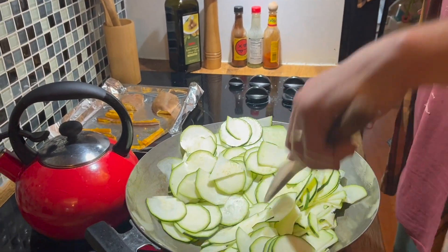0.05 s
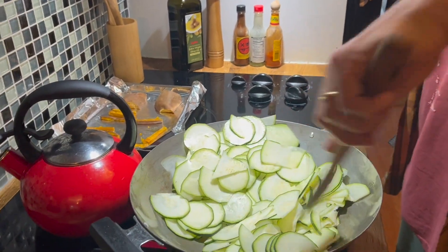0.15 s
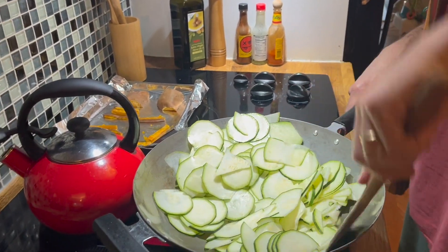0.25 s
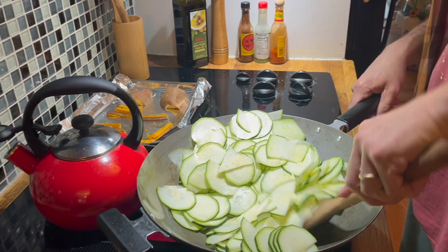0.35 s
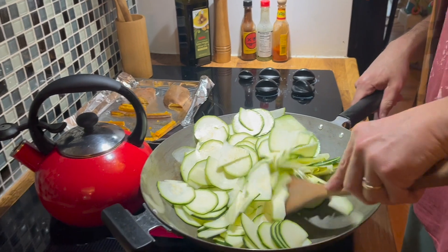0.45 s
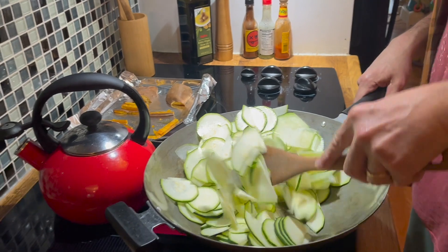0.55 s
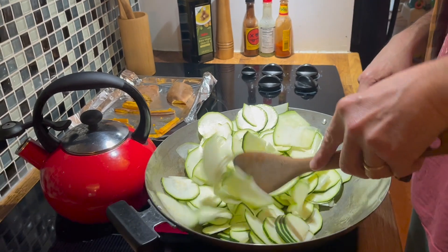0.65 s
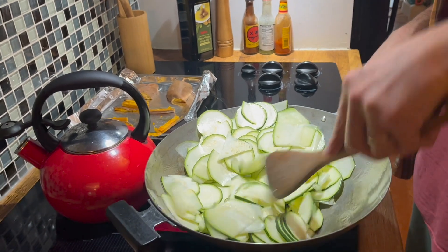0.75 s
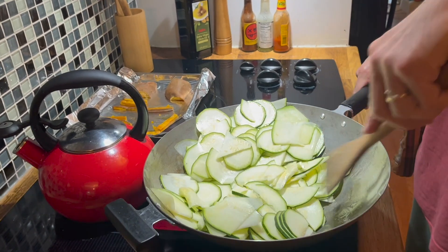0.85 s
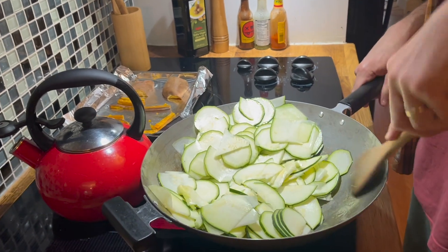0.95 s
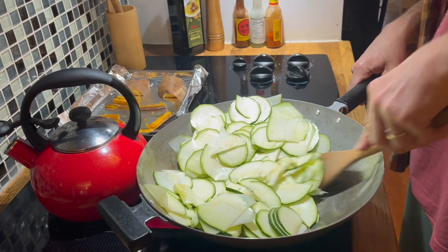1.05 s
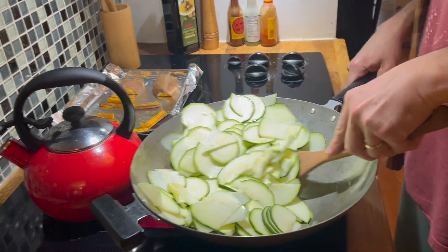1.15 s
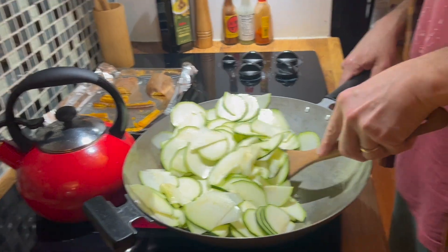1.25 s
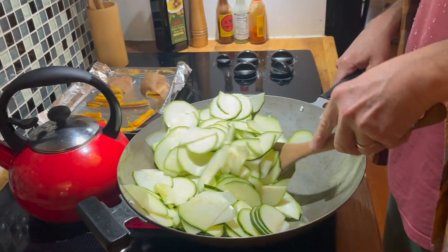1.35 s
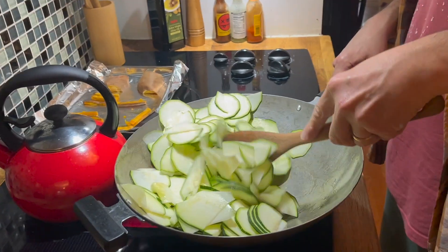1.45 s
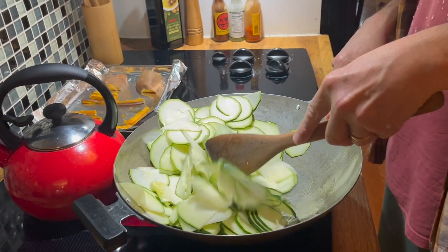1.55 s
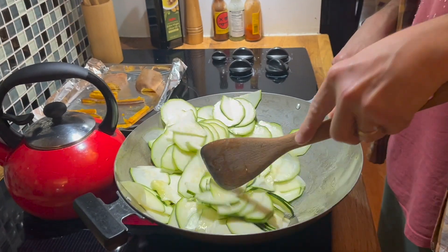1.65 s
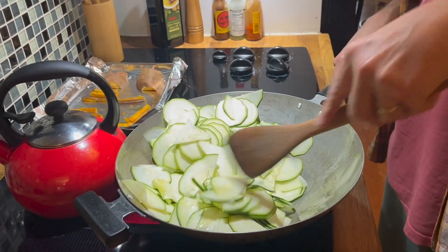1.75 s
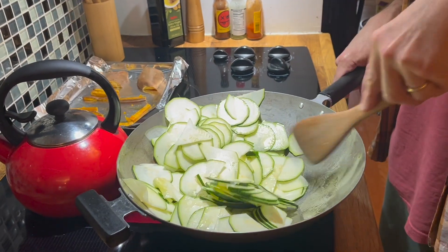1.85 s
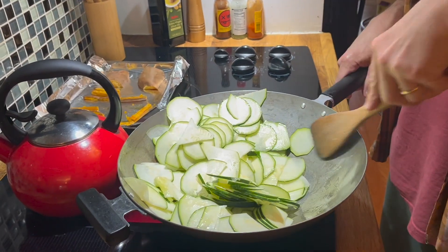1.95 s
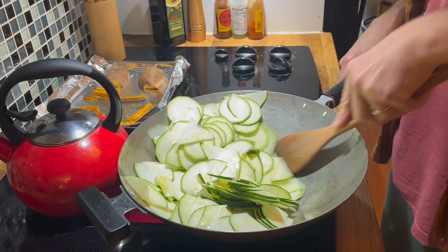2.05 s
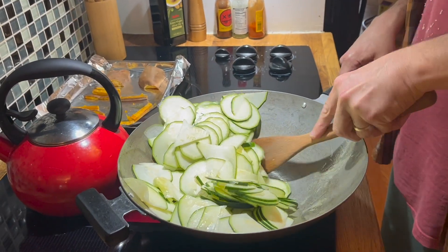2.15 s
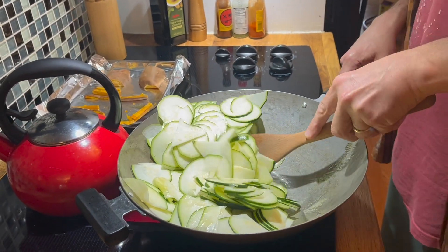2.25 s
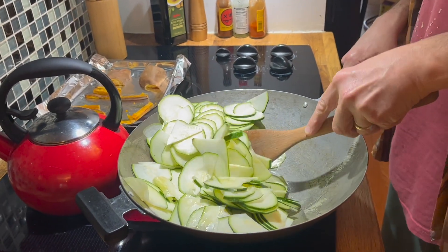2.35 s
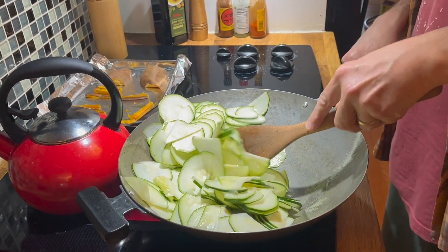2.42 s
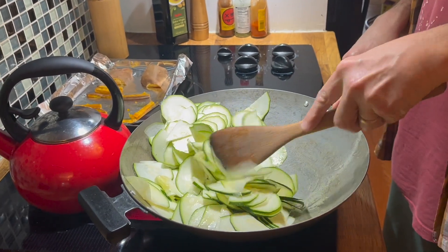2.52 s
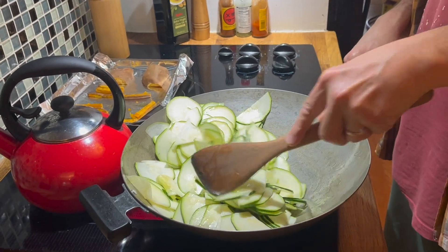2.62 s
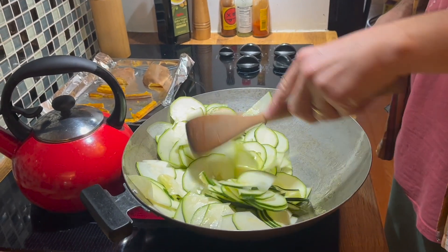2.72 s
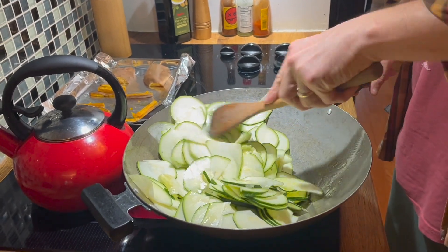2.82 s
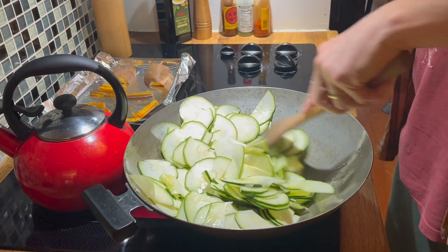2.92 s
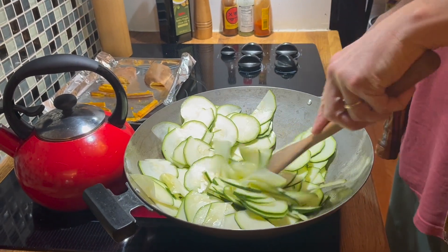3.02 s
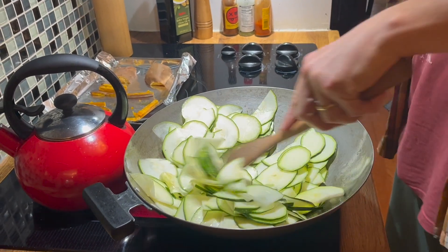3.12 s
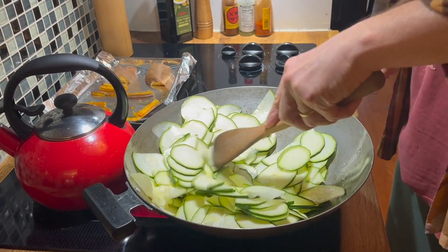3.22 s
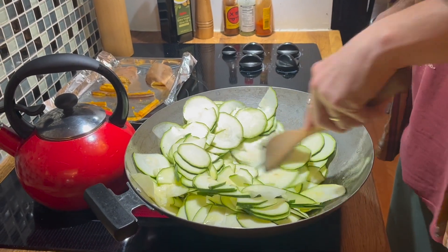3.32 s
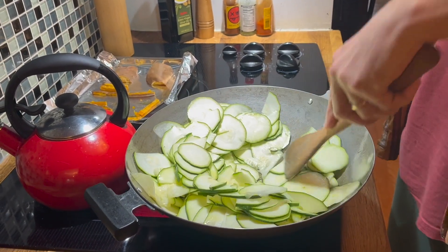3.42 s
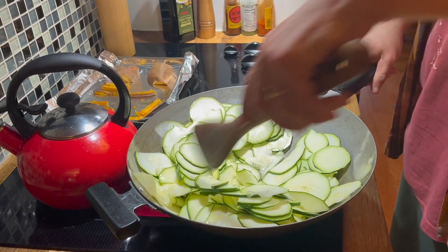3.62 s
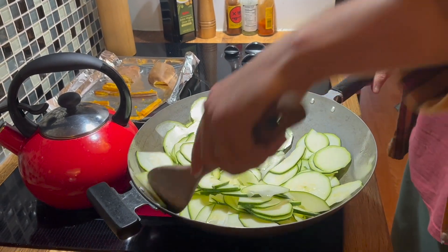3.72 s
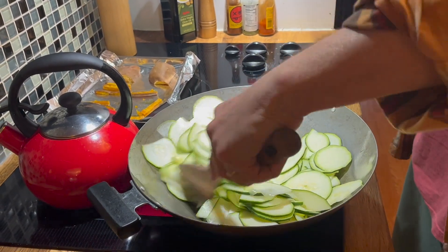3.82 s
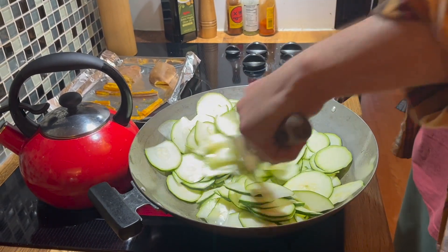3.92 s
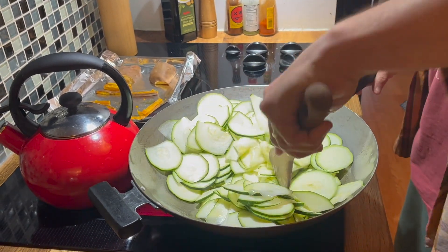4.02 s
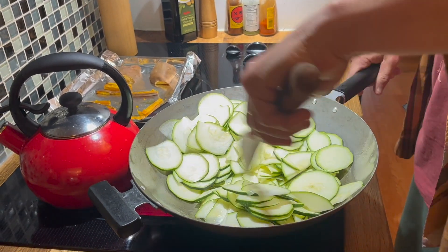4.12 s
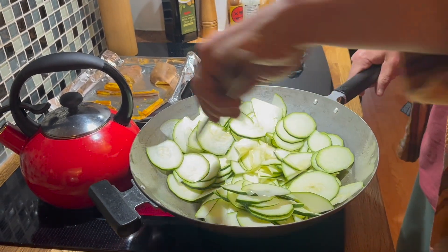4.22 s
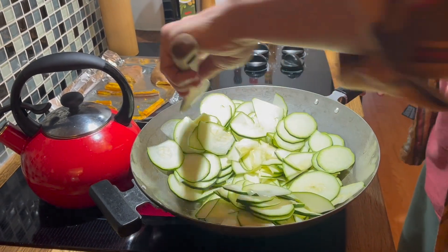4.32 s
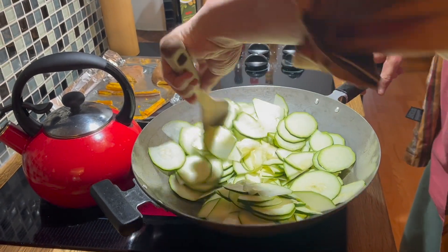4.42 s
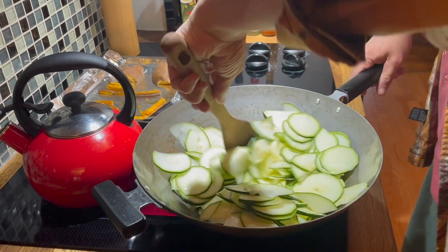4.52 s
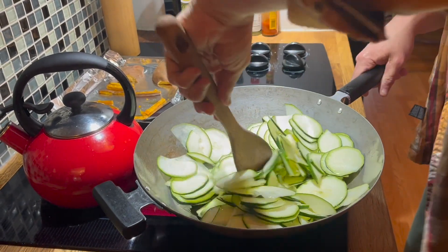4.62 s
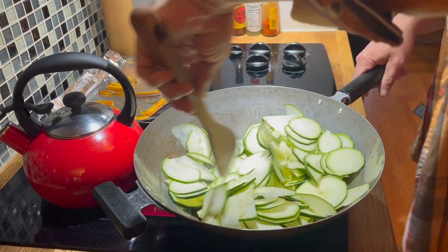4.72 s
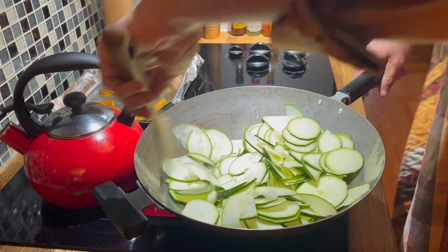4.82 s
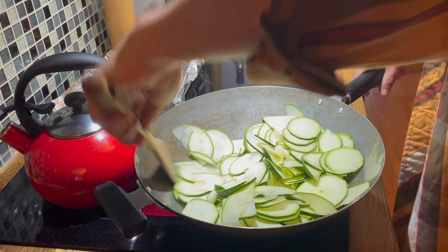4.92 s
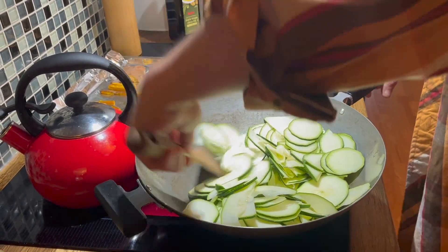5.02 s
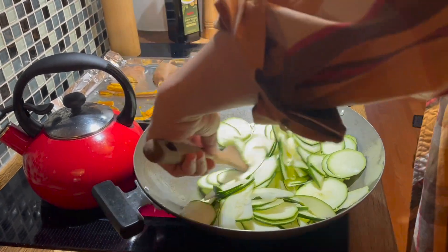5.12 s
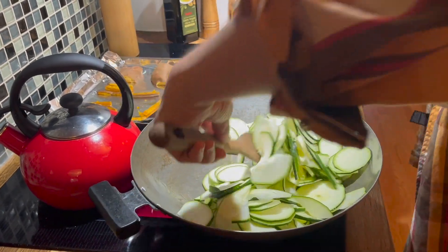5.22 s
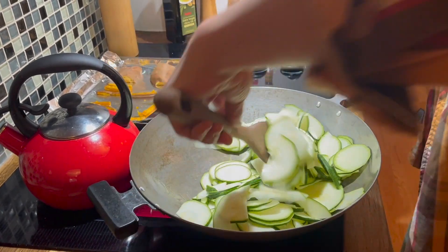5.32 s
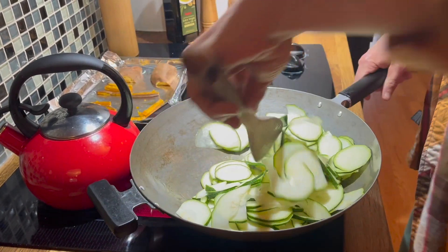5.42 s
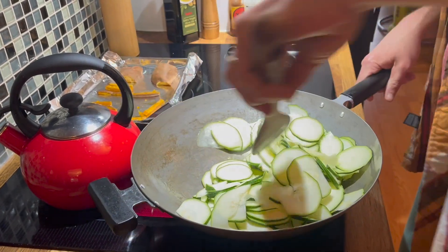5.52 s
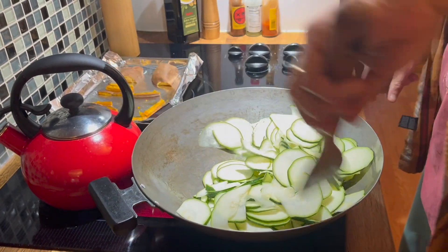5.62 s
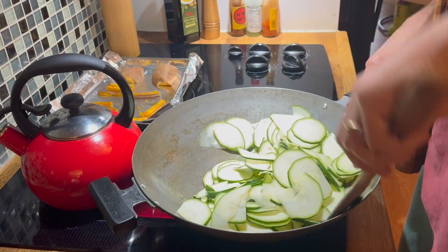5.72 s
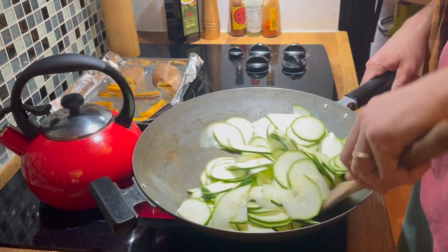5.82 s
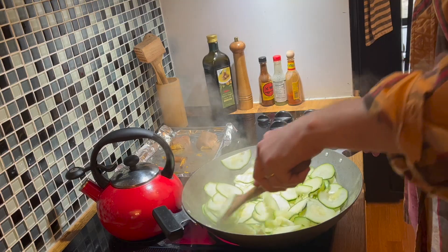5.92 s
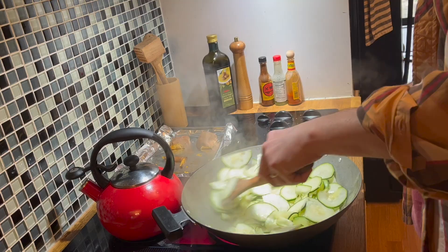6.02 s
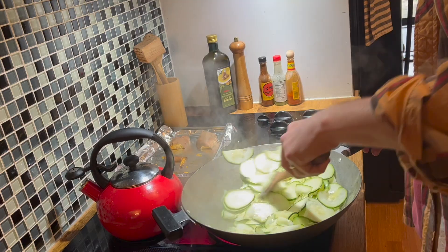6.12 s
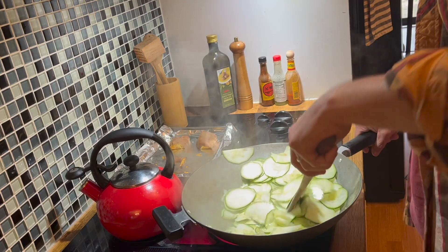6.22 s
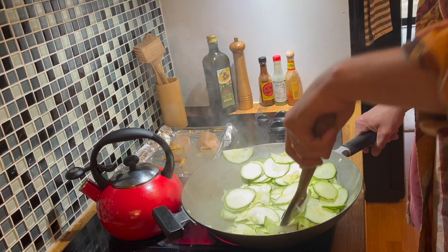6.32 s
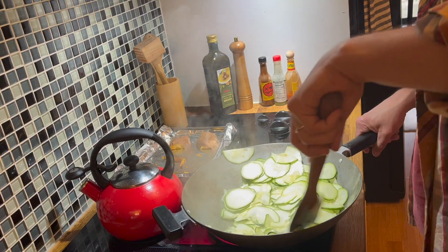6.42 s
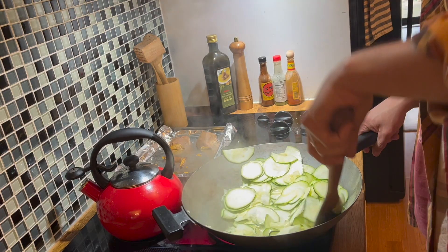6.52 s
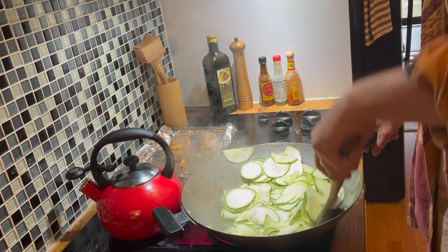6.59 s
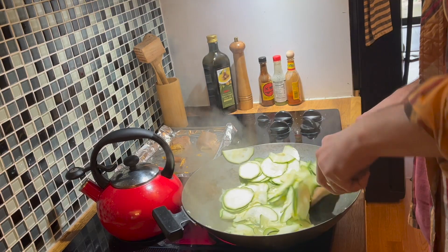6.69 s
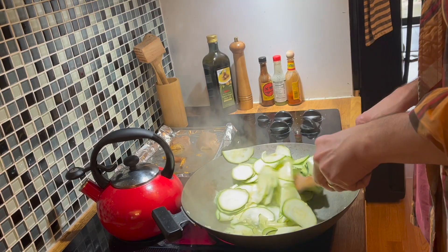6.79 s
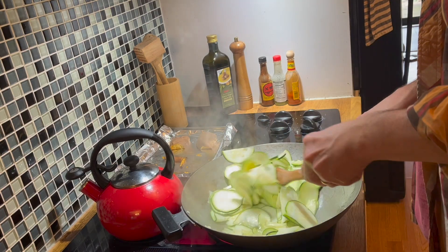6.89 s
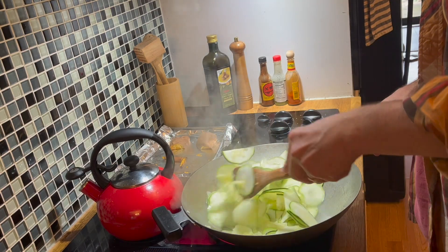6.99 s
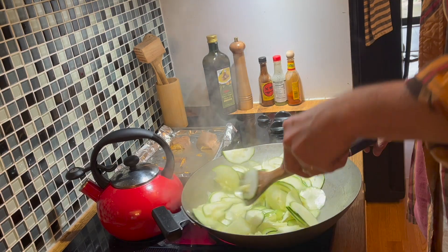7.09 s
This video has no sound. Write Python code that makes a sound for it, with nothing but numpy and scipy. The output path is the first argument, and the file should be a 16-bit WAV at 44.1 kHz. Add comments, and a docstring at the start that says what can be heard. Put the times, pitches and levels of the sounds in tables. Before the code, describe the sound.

In a home kitchen, juicy vegetable slices crackle and hiss in hot oil throughout. Short spoon strokes drag and shuffle them, with dull low bumps of the pan, small dry clicks and a few hollow wooden clacks on the rim. Juice gurgles briefly around three seconds, and little steam squirts hiss now and then. The microphone is close, drawing slightly back near the end, with light tiled echo and a quiet low hob hum.

```python
"""Wet zucchini slices fry throughout in a wide metal pan: oil and steam crackle as random pulses and
ringing bubbles, surging at each turn. From the start a spoon pushes the slices (coloured noise through
pan resonances) and bumps the pan on the hob (low modes); it knocks the rim (damped modes and noise)
from 0.19 s to 5.65 s. Oil spits from 0.84 s to 3.88 s; juice gurgles from about 2.6 s. Under it all
an electric hob hums over a fan, the hum's balance shifting from 4.8 s to 6 s; walls echo the taps."""
import sys
import numpy as np
from scipy import signal
from scipy.fft import rfft, irfft, next_fast_len
from scipy.io import wavfile
from scipy.ndimage import uniform_filter1d, map_coordinates

SR = 44100
rng = np.random.default_rng(int(sys.argv[2]) if len(sys.argv) > 2 else 0)


def generate_wav(sig):
    """Save sig (samples, or channels by samples) to the path in sys.argv[1] as 16-bit PCM at SR."""
    pcm = np.round(np.clip(np.atleast_2d(sig).T, -1, 1) * 32767).astype(np.int16)
    wavfile.write(sys.argv[1], SR, pcm)


N = 315315

# low modes the rocking pan sets ringing, the strongest near 59 Hz a mode of the room: f/Hz, relative level/dB,
# undamped t60/s
LOW_MODES = [(43.7, -15, 0.3), (58.7, -0.5, 0.27), (87, -19, 0.11), (164, -12.5, 0.28)]
PUSH_S, EASE_S = 0.087, 0.047  # rise time, decay time constant


def frying():
    """Water boils off in the oil: big wet bubbles, plus small ones and fine spray surging with each turn."""
    # water boiling out of the heap: t/s, nominal level/dB
    boiling = [(0.0, -34.5), (0.12, -36.5), (0.5, -39.5), (0.9, -36.5), (1.93, -37), (2.25, -40.5),
               (2.5, -38), (2.64, -35.5), (2.95, -36.5), (3.1, -37), (3.35, -38), (4.02, -38.5),
               (4.76, -40), (4.9, -37), (5.21, -43.5), (5.4, -40.5), (5.87, -39), (6.91, -41),
               (7.15, -37.5)]
    # slices landing wet side down: t/s, hold until they dry/s, oil sizzle/dB, nominal spray/dB
    turns = [(0.02, 0.2, -37, -45.5), (0.43, 0.34, -41.5, -48.5), (1.09, 0.29, -40.5, -48),
             (1.53, 0.12, -39, -47.5), (2.03, 0.036, -41, -50), (2.3, 0.2, -45, -44.5),
             (2.545, 0.087, -39.5, -57), (2.83, 0.29, -43.5, -49.5), (3.27, 0.49, -44, -49),
             (4.7, 0.23, -42.5, -53), (5.04, 0.1, -49, -42.5), (5.34, 0.45, -40.5, -44),
             (6.11, 0.48, -37.5, -44)]
    # big wet bubbles: f/Hz, relative density/dB
    bubbling_spectrum = [(700, -26), (1300, -6), (1600, -1), (2000, 1.5), (2400, -3), (3000, -9),
                         (4500, -46), (9000, -30)]
    # oil sizzle: f/Hz, relative density/dB
    sizzle_spectrum = [(1200, -25), (2500, -3), (3300, 0), (4700, -.5), (5500, -4.5), (7000, -7),
                       (8500, -11), (11000, -22), (15000, -40)]
    # finest spray: f/Hz, relative density/dB
    spray_spectrum = [(5000, -20), (7500, -3), (9500, 1), (11000, .5), (12000, -2), (13500, -4.5),
                      (14300, -7), (15000, -18)]

    bubbling_db = np.interp(np.arange(N) / SR, *np.transpose(boiling))
    sizzle_surges, spray_surges = [], []
    for s, hold_s, sizzle_db, spray_db in turns:
        surge = swell(s, hold_s, rise_s=0.18, fall_s=0.23)
        sizzle_surges.append(amp(sizzle_db) * surge)
        spray_surges.append(amp(spray_db) * surge)
    # resting levels: slices lying still
    sizzle_gain = combined(-41.5, sizzle_surges)
    spray_gain = combined(-51, spray_surges)
    flare = wobble(22.02)  # droplets meet the hot metal in clumps

    big = np.array([bubbles(2074, spread=0.1736, rate_hz=320, cycles=70, spread_db=3.5) for _ in range(2)])
    small = np.array([bubbles(3730, spread=0.2, rate_hz=300, cycles=270, spread_db=8.5) for _ in range(2)])
    bubbling = amp(-1.7) * crackle(bubbling_spectrum, rate_hz=700, spread_db=3.5, wash=0.7)
    bubbling += amp(-3.5) * big
    sizzle = crackle(sizzle_spectrum, rate_hz=1100, spread_db=2.0, wash=0.88)
    sizzle += amp(-9.0) * small
    spray = crackle(spray_spectrum, rate_hz=1600, spread_db=4.0, wash=1.0)
    return (amp(bubbling_db + 0.91 * flare) * patchy(bubbling, depth_db=1.0)
            + sizzle_gain * amp(0.69 * wobble(35)) * patchy(sizzle, depth_db=1.0)
            + spray_gain * amp(0.5 + 1.6 * flare) * spray)


def crackle(spectrum, rate_hz, spread_db, wash):
    """Bursting bubbles of uneven size, over the wash of countless smaller ones."""
    size = amp(spread_db * np.minimum(rng.exponential(size=(2, N)), 4))
    pops = (rng.random((2, N)) < rate_hz / SR) * size * rng.choice([-1, 1], (2, N))
    return coloured(unit(pops) + wash * rng.standard_normal((2, N)), spectrum)


def bubbles(centre_hz, spread, rate_hz, cycles, spread_db):
    """Wet bubbles, each ringing for some cycles at its own pitch; rms 1."""
    count = int(rate_hz * N / SR)
    when, pitch, size, phase = rng.random((count, 4)).T[..., None]
    # most lie near the centre, a few far above
    hz = centre_hz * np.exp(spread * np.tan(2.2 * (pitch - 0.44)))
    k = np.arange(SR // 40)
    turns = hz * k / SR
    level_db = -spread_db * np.log(size + 0.079) - 60 * turns / cycles
    onset = 1 - np.exp(-turns / 2)
    waves = amp(level_db) * np.sin(2 * np.pi * (turns + phase)) * onset
    places = (when * N).astype(int) + k
    return unit(np.bincount(places.ravel(), waves.ravel(), N)[:N])


def patchy(x, depth_db):
    """Each patch of the pan boils by itself: x under a random gain over pitch and time; rms 1."""
    z = signal.stft(x, nperseg=512)[2]
    field = rng.standard_normal(z.shape[1:])
    for _ in range(2):
        field = uniform_filter1d(field, size=6, axis=0)
        field = uniform_filter1d(field, size=9, axis=1)
    return unit(signal.istft(z * amp(depth_db * unit(field)), nperseg=512)[1][:, :N])


def gurgles():
    """Juice trapped under the heap boils in a run of distinct bubbles, all of much the same size."""
    # boiling juice: t/s, hold/s, level/dB
    runs = [(2.624, 0.073, -39), (3.197, 0.15, -40), (3.488, 0.15, -40)]
    juice = np.array([bubbles(2130, spread=0.082, rate_hz=130, cycles=70, spread_db=3.0) for _ in range(2)])
    return juice * sum(amp(db) * swell(s, hold_s, PUSH_S, EASE_S) for s, hold_s, db in runs)


def squirts():
    """A slice pressed on the metal lets out a squirt of steam, a narrow hiss around its own pitch."""
    # squirts of steam: centre t/s, half-width at 1/e^2/s, level/dB, f/Hz
    jets = [(0.44, .04, -42, 5130), (0.65, 0.059, -40, 4470), (1.074, 0.065, -38, 3180),
            (1.93, 0.023, -36, 4350), (2.544, .028, -35.5, 4350), (2.828, 0.024, -35.5, 2700),
            (4.282, 0.11, -43, 3800), (4.568, 0.026, -44, 3800), (6.105, .03, -41, 3900)]
    out, t = np.zeros((2, N)), np.arange(-SR // 6, SR // 6) / SR
    for s, half_width_s, db, hz in jets:
        hiss = coloured(rng.standard_normal((2, len(t))), [(hz / 2, -45), (hz, 0), (hz * 2, -45)])
        steam = amp(db) * hiss * np.exp(-2 * (t / half_width_s) ** 2)
        add(out, s + t[0], steam[:, s + t >= 0])
    return out


def spits():
    """Larger drops burst singly, each a short pop centred on its own pitch."""
    # largest spits of oil: t/s, relative level/dB, f/Hz
    drops = [(0.8397, -28, 1850), (1.069, -19.5, 2860), (1.111, -22, 2530), (1.3115, -23.5, 2060),
             (1.348, -23, 1800), (1.4422, -22, 1880), (2.7206, -21.5, 2210), (2.9259, -21, 2130),
             (3.2883, -20, 1980), (3.345, -19.5, 2060), (3.88, -19, 1910)]
    out, t = np.zeros((2, N)), np.arange(SR // 20) / SR
    for s, db, hz in drops:
        pop = np.sin(2 * np.pi * hz * t) * amp(-60 * t / 0.039)
        splash = burst([(hz / 2, -13), (hz, 0), (hz * 2, -13), (hz * 4, -30)], t, t60_s=0.024)
        add(out, s, amp(db) * (amp(-7) * pop + amp(-6) * splash))
    return out


def stirring():
    """Slices rub dully and the spoon's edge scrapes, in tiny jerks that ring the pan and shake it."""
    # spoon strokes: t/s, hold/s, nominal rubbing/dB, nominal scraping/dB
    strokes = [(0.0, 0.11, -41, -51), (0.34, 0.19, -39, -46), (0.62, 0.29, -40.5, -47),
               (1.026, 0.13, -39, -42), (1.203, 0.26, -50, -42.5), (1.524, 0.32, -42.5, -46.5),
               (1.894, 0.13, -43, -44), (2.05, 0.26, -42.5, -44), (2.38, 0.22, -42.5, -43.5),
               (2.675, 0.097, -42, -43), (2.853, 0.066, -40, -40), (3.116, 0.64, -45, -50),
               (3.783, 0.5, -45.5, -48.5), (4.396, 0.15, -39.5, -47.5), (4.76, 0.38, -41, -60),
               (5.773, 0.15, -41, -46), (5.983, 0.67, -40, -66), (6.654, 0.52, -38.5, -52)]
    # modes of the loaded pan: f/Hz, relative level/dB, t60/s
    pan_modes = [(388, -7.5, 0.065), (596, -2.5, 0.033), (750, -1, 0.089), (853, 0, 0.069),
                 (939, 3.5, 0.14), (998, 3, 0.23), (1112, -1.5, 0.014), (1289, 3, 0.073), (1425, 0, 0.038)]
    # slices rubbing: f/Hz, relative density/dB
    rubbing_spectrum = [(200, -6.5), (500, 0), (700, -0.5), (950, -6), (1500, 1.5), (2500, 16.5),
                        (5000, -12)]
    # spoon's edge scraping: f/Hz, relative density/dB
    scraping_spectrum = [(500, -22), (800, -2.5), (960, 2.5), (1150, -7), (1400, -1), (2200, -7),
                         (4000, -20)]

    # slices settle between strokes
    push = combined(-45.5, [amp(db) * swell(s, hold_s, PUSH_S, EASE_S) for s, hold_s, db, _ in strokes])
    # scraping dies away more slowly than rubbing
    drag = combined(-120, [amp(db) * swell(s, hold_s, PUSH_S, 0.09) for s, hold_s, _, db in strokes])

    def driven(x, modes):
        return unit(filtered(x, lambda hz: resonance(modes, hz)))

    rubbing = driven(crackle(rubbing_spectrum, rate_hz=500, spread_db=2.0, wash=0.96), pan_modes)
    scraping = driven(crackle(scraping_spectrum, rate_hz=250, spread_db=1.5, wash=0.84), pan_modes)
    rumble = coloured(rng.standard_normal((2, N)), [(100, -2), (300, -24)])
    shaking = driven(rumble, LOW_MODES)
    moving = amp(-1.04 + 0.99 * wobble(26)) * rubbing + amp(-14 + 2.3 * wobble(6.2)) * shaking
    return push * moving + drag * amp(1.4 * wobble(30)) * scraping


def resonance(modes, hz):
    """Gain of a body driven steadily: the shorter a mode rings, the wider its peak."""
    power = 0
    for centre_hz, db, t60_s in modes:
        detuning = 2 * np.pi * t60_s * (hz - centre_hz) / np.log(1000)
        power = power + amp(2 * db) / (1 + detuning ** 2)
    return np.sqrt(power)


def knocks():
    """Wood hits the rim: a crack, the spoon's bending modes and a hollow clack that the food soon damps."""
    # blows and bounces: t/s, pan clack/dB, spoon's first, second, third mode/dB, crack/dB (all relative),
    # crack's upper edge f/Hz, spoon's pitch ratio as the grip shifts
    blows = [(0.1863, -26, -36, -21, -26, -17.5, 6300, 0.96),
             (0.1907, -25.5, -36, -10.5, -22, -18, 6600, 0.94),
             (0.9150, -36, -25.5, -23, -27, -32, 5400, 0.98), (0.917, -39, -24, -20, -23, -31, 5400, 1.05),
             (0.9208, -41, -31, -20, -24, -35, 5400, 0.96), (0.9247, -37, -25.5, -18.5, -22, -27, 5630, 1),
             (0.932, -34, -42, -28, -30, -35, 4300, 1.2), (1.908, -35, -36, -46, -33, -28, 4400, 1.04),
             (3.6758, -21.5, -30, -39, -38, -19.5, 4250, .92),
             (4.8344, -30.5, -33, -26, -24, -35, 8000, 1.16),
             (4.8361, -22, -31, -27, -19, -28.5, 8600, 1.02),
             (5.6451, -20, -27, -24, -38, -23.5, 4300, 1.02),
             (5.6514, -20.5, -27, -30, -34, -26, 4500, 0.87)]
    # rim modes: f/Hz, relative level/dB, t60/s
    rim_modes = [(568, -11, 0.12), (1090, -6.5, 0.035), (1274, -1.5, 0.033), (1402, 1.5, 0.042),
                 (2090, -18, 0.035), (2830, -7, 0.036), (3390, -8.5, 0.053), (4090, -7.5, 0.04)]
    # spoon's bending modes: nominal f/Hz, relative level/dB, t60/s before the hand's damping
    spoon_modes = [(1490, 1, .055), (2340, -3, .018), (2520, -3, .022), (2620, 0, .036), (4230, -3, .032),
                   (4420, -2, .04), (4750, -3, .028), (4980, -6, .025)]
    # pan clack: f/Hz, relative density/dB
    clack_spectrum = [(150, -10), (500, -4), (750, -2.5), (1000, 5), (1250, 4.5), (1430, 7), (1700, -1),
                      (2300, -3.5), (3200, -23.5)]
    # crack: f/Hz, relative density/dB
    crack_spectrum = [(400, -13), (1000, -2), (1800, -6.5), (3100, 0.5), (4200, -1), (5200, -3.5),
                      (6100, -0.5), (9000, -6), (15000, -20)]

    out, t = np.zeros((2, N)), np.arange(SR // 3) / SR
    for s, pan_db, first_db, second_db, third_db, crack_db, edge_hz, grip in blows:
        # weight rings the rim's low modes, sharpness the high ones
        blow = [(1500, pan_db), (2800, crack_db)]
        rung = [(hz, db + along(blow, hz), t60_s) for hz, db, t60_s in rim_modes]
        rim = amp(3.5) * ring(rung, t, scatter_db=0.5)
        clack = amp(pan_db + 1.5) * burst(clack_spectrum, t, t60_s=0.065)
        # where the spoon is struck decides which of its modes speak
        struck = [(1500, first_db), (2300, second_db), (2900, second_db), (4200, third_db)]
        bent = [(hz * grip, db + along(struck, hz), t60_s) for hz, db, t60_s in spoon_modes]
        hand = amp(5 - 60 * t / 0.32)  # the hand damps the spoon
        wood = hand * ring(bent, t, scatter_db=0.4)
        # a softer contact takes the top off the crack; a 1 ms snap leads its decay
        contact = [(edge_hz, 0), (edge_hz * 1.1, -10)]
        noise = filtered(burst(crack_spectrum, t, t60_s=0.042), lambda hz: amp(along(contact, hz)))
        crack = amp(crack_db + 4) * noise * (1 + np.exp(-t / 0.001))
        add(out, s, (rim + clack + wood + crack) * (1 - np.exp(-t / 0.00031)))
    return out


def ring(modes, t, scatter_db):
    """Damped modes, struck at slightly new strengths, on two paths to the microphone."""
    hz, db, t60_s = np.transpose(modes)[..., None]
    level_db = db + scatter_db * rng.standard_normal((2, len(modes), 1))
    phase = rng.uniform(0, 2 * np.pi, level_db.shape)
    return np.sum(amp(level_db - 60 * t / t60_s) * np.sin(2 * np.pi * hz * t + phase), axis=1)


def ticks():
    """A light touch of the spoon's edge on metal gives only a dry click of a few cycles, with grit."""
    # touches: t/s, relative level/dB, f/Hz
    touches = [(1.311, -23, 3600), (2.4533, -23, 2600), (2.992, -25, 3300), (3.0095, -16, 2870),
               (5.671, -27, 4200)]
    out, t = np.zeros((2, N)), np.arange(SR // 50) / SR
    for s, db, hz in touches:
        click = np.sin(2 * np.pi * hz * t) * amp(-60 * t / 0.011)
        grit_spectrum = [(hz / 3, -20), (hz * 0.72, -1), (hz * 1.2, 0), (hz * 1.8, -20), (hz * 4, -36)]
        grit = burst(grit_spectrum, t, t60_s=0.015)
        add(out, s, amp(db) * (amp(-8) * click + amp(-2) * grit))
    return out


def bumps():
    """Pushed or knocked by the spoon, the pan rocks and judders on the hob; turned slices flop back."""
    # bumps: nominal t/s, relative level/dB, slap relative to the bump/dB
    jolts = [(0.196, -38, 5), (0.223, -23.5, -7), (0.275, -29.5, -3), (0.297, -23, -22), (0.425, -28, 1),
             (0.53, -45, 9), (0.929, -38, 5), (2.906, -28, -24), (3.31, -29, -28), (3.698, -30, 4.5),
             (4.438, -25, -15), (4.494, -21, -7), (4.529, -23, -15), (4.618, -28.5, -22), (4.846, -33.5, 8),
             (5.121, -27.5, 0), (5.149, -22.5, -23), (5.661, -35, 7.5), (5.679, -26.5, -12),
             (6.022, -26.5, -8), (6.319, -35, 0.5), (6.678, -35, 0)]
    # slices slapping down: f/Hz, relative density/dB
    slap_spectrum = [(60, -11), (170, 4.5), (350, 2), (700, -4), (1500, -36), (4000, -45)]
    judder_spectrum = [(25, 2), (50, 17.5), (80, 15.0), (150, 6.0), (300, -29.5)]
    out, t = np.zeros((2, N)), np.arange(SR // 2) / SR
    # a soft push sets the rocking modes off together; the hand on the handle damps them
    rocking = sum(amp(db - 60 * t / t60_s) * np.sin(2 * np.pi * hz * t) for hz, db, t60_s in LOW_MODES)
    thud = amp(-1) * rocking * (1 - np.exp(-t / 0.01)) * amp(-60 * t / 0.54)
    for s, db, slap_db in jolts:
        judder = amp(-10.5) * burst(judder_spectrum, t, t60_s=0.48)
        slap = amp(slap_db - 5.5) * burst(slap_spectrum, t, t60_s=0.23) * (1 - np.exp(-t / 0.0015))
        add(out, s - 0.004, amp(db) * (thud + judder + slap))
    return out


def kitchen(x):
    """The tiled walls answer after 4 ms with decaying noise; the treble dies first."""
    # reverberation: f/Hz, t60/s
    decay = [(150, 0.99), (1500, 0.25), (5000, 0.33), (14000, 0.071)]
    hz, t, z = signal.stft(rng.standard_normal((2, SR // 2)), SR, nperseg=256)
    fading = z * amp(-60 * t / along(decay, hz)[:, None])
    tail = signal.istft(fading, SR, nperseg=256)[1]
    tail = np.pad(tail, ((0, 0), (SR // 250, 0)))
    return signal.fftconvolve(x, tail / np.linalg.norm(tail[0]), axes=1)[:, :N]


def hob():
    """The hob hums over its cooling fan; the hum's balance shifts as the microphone draws back."""
    # mains lines: f/Hz, nominal level close up/dB, nominal level a step further back/dB
    lines = [(120.7, -53.5, -61), (240.2, -44.5, -44.5), (350, -63.5, -65)]
    # fan: f/Hz, relative density/dB
    fan_spectrum = [(20, -25), (45, -7), (100, 0), (150, -0.5), (190, -2.5), (225, 6.5), (300, -6),
                    (450, -10.5), (600, -3.5), (1500, -16), (6000, -21)]
    t = np.arange(N) / SR
    back = np.interp(t, [4.8, 6], [0, 1])
    hum = 0
    for hz, near_db, far_db in lines:
        level_db = near_db + back * (far_db - near_db) + 1.44 * wobble(3.35)
        hum = hum + amp(level_db) * np.sqrt(2) * np.sin(2 * np.pi * hz * t + 0.054 * wobble(7.9))
    fan = amp(-47.5) * coloured(rng.standard_normal((2, N)), fan_spectrum)
    return hum * amp([[-1.1], [1.1]]) + ports(fan)  # hum leans right


def ports(pair):
    """Two unrelated signals become left and right: alike in the bass, out of step in the treble."""
    # left-right likeness: f/Hz, correlation before the lag
    alike = [(60, .997), (130, .96), (300, .9), (600, .75), (1200, .7), (1580, .05), (1850, .9), (3000, .9),
             (4500, .97), (6500, .78), (8400, .95), (10000, .8), (12000, .95), (13700, .65), (15000, .95)]
    # lag of the left port: f/Hz, phase/rad
    lag = [(20, 0), (5100, 0), (5800, .9), (6900, 1.2), (8300, 3.1), (11200, 6.2), (12700, 6.3),
           (14700, 9.4)]

    def blend(hz):
        angle = np.arccos(np.clip(along(alike, hz), -1, 1)) / 2
        return np.array([np.cos(angle), np.sin(angle)])

    shared, apart = filtered(pair, blend)
    sides = np.array([shared + apart, shared - apart])
    return filtered(sides, lambda hz: np.exp(0.5j * along(lag, hz) * np.array([[-1], [1]])))


def amp(db):
    """Decibels to gain."""
    return 10 ** (np.asarray(db) / 20)


def unit(x):
    """x at rms 1."""
    return x / np.sqrt(np.mean(x ** 2) + 1e-20)


def along(points, hz):
    """(Hz, value) points read on a log axis."""
    f, v = np.transpose(points)
    return np.interp(np.log(hz + 1), np.log(f + 1), v)


def wobble(rate_hz):
    """A smooth random curve through rate_hz knots a second."""
    knots = rng.standard_normal(int(N * rate_hz / SR) + 4)
    return map_coordinates(knots, [np.arange(N) * rate_hz / SR])


def filtered(x, response):
    """x times a response of frequency."""
    n = x.shape[-1]
    m = next_fast_len(n + 8192)
    return irfft(rfft(x, m) * response(np.fft.rfftfreq(m, 1 / SR)), m)[..., :n]


def coloured(x, spectrum):
    """x shaped by the given spectrum, at rms 1."""
    return unit(filtered(x, lambda hz: amp(along(spectrum, hz))))


def burst(spectrum, t, t60_s):
    """A dying puff of coloured noise."""
    return coloured(rng.standard_normal((2, len(t))), spectrum) * amp(-60 * t / t60_s)


def swell(s, hold_s, rise_s, fall_s):
    """Gain that rises up to time s, holds, then dies away with time constant fall_s."""
    t = np.arange(N) / SR - s
    return np.clip(1 + t / rise_s, 0, 1) * np.exp(-np.maximum(t - hold_s, 0) / fall_s)


def combined(rest_db, gains):
    """Joint gain of unrelated sounds over a resting level."""
    return np.sqrt(amp(rest_db) ** 2 + sum(gain ** 2 for gain in gains))


def add(track, s, sound):
    """Mix a sound into a track at time s."""
    part = track[..., max(round(s * SR), 0):][..., :sound.shape[-1]]
    part += sound[..., :part.shape[-1]]


def scene():
    """Pan and spoon in the kitchen, over the hob; only the taps and spits echo."""
    taps = knocks() + ticks() + spits()
    pan = frying() + gurgles() + squirts() + stirring() + bumps()
    return ports(pan + taps + amp(-12) * kitchen(taps)) + hob()


def record(dry):
    """The microphone sheds the deepest rumble; nothing passes above the band limit."""
    low_hz, top_hz = 36.3, 15070

    def response(hz):
        ratio = hz / low_hz
        return (hz < top_hz) * ratio ** 4 / np.sqrt(1 + ratio ** 8)

    return filtered(dry, response)


dry = scene()
out = record(dry)
generate_wav(out)
```